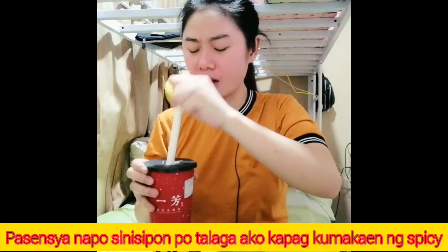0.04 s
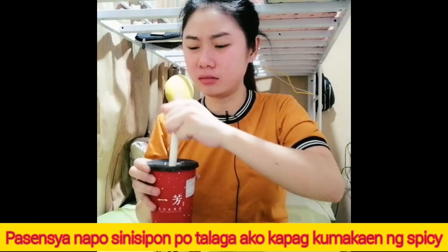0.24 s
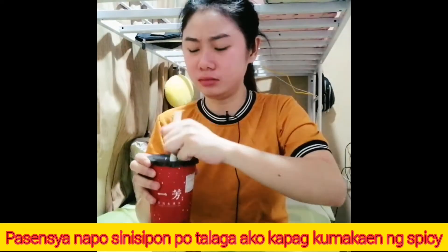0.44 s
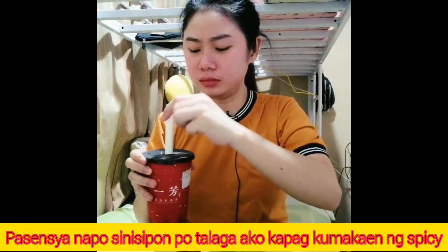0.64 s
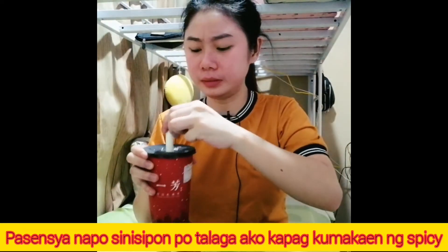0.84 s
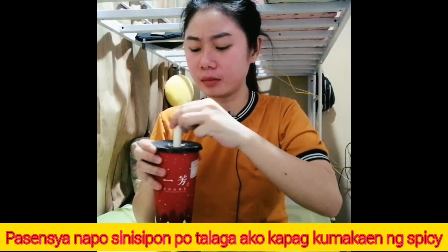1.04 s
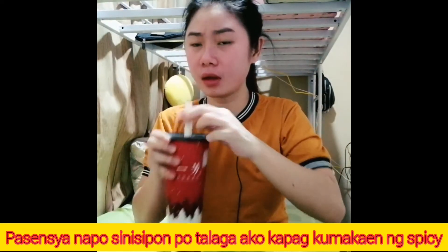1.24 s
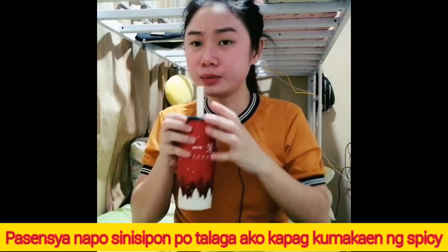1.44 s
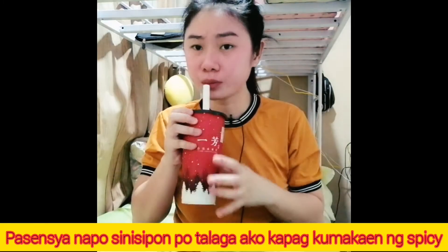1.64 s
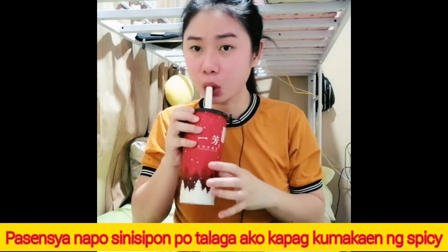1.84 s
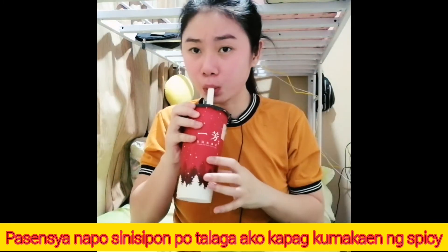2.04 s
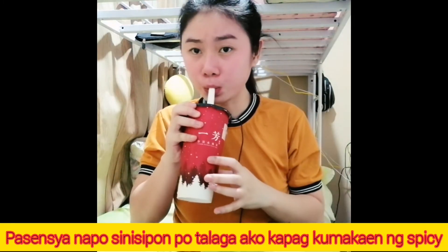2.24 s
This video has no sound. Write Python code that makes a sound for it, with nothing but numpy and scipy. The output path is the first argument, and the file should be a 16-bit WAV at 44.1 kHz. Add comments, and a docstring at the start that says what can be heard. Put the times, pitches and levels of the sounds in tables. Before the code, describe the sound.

Close up in a small room, a straw sticks and slips in a drink lid: one long rasping squeak, two shorter ones, then the cup is lifted with faint plastic ticks over low fan hum and rumble.

```python
"""A fan hums and handling rumbles from the start; two faint finger ticks follow in the first 0.11 s.
From 0.19 s a plastic straw is worked through a cup lid in three strokes, close up in a small room.
It sticks and slips: each slip knocks the lid and rings the cup; fast runs fuse into a squeak, single ones snap.
From 1.3 s, strokes over, the cup is lifted with more ticks (filtered noise bursts) and a faint rub.
The rumble and fan air are coloured noise; the fan air is loudest at 1.2 s."""
import sys
import numpy as np
from scipy import signal
from scipy.fft import rfft, irfft, next_fast_len
from scipy.io import wavfile

SR = 44100
rng = np.random.default_rng(int(sys.argv[2]) if len(sys.argv) > 2 else 0)


def transcribe(u):
    """Save the signal u as a 16-bit wav file named by the first command-line argument.

    u: samples, shape (n,) or (channels, n), limited to [-1, 1]; the rate is SR.
    q: integer samples, one column per channel.
    """
    v = np.clip(np.atleast_2d(u).T, -1, 1)
    q = np.round(v * 32767).astype(np.int16)
    wavfile.write(sys.argv[1], SR, q)


N = 101430

# Fan air spectrum. Each row: frequency in Hz, relative level in dB.
FAN_AIR_COLOUR = [(30, 16.5), (260, -2), (400, 5.5), (800, 3.5), (1800, -14.5), (3800, -29), (5500, -36),
                  (15000, -55)]
# Fan air level. Each row: time in seconds, rms level in dB.
FAN_AIR_LEVEL = [(.8, -52.5), (1.2, -42), (2.1, -50.5)]
# Fan motor lines. Each row: frequency in Hz, rms level in dB.
FAN_MOTOR_LINES = [(360.7, -60.5), (420, -60.5), (662, -61), (3752, -78)]

# Arm movements. Each row: centre in seconds, rumble level in dB, half length (to 1/e) in seconds.
ARM_MOVEMENTS = [(.01, -39.5, 0.035), (0.44, -35.5, 0.079), (1.776, -38, 0.086), (1.971, -35, 0.05),
                 (2.32, -35, 0.19)]
# Handling rumble spectrum. Each row: frequency in Hz, relative level in dB.
RUMBLE_COLOUR = [(10, -13), (25, 2), (75, 3), (160, -6.5), (250, -19), (600, -88.5)]
RUMBLE_FLOOR_DB = -58

# Fingers ticking on cup and straw. Each row: start in seconds, peak level in dB, centre frequency in Hz.
FINGER_TICKS = [(.068, -36.5, 2720), (0.106, -41, 2700), (1.07, -32, 2460), (1.303, -30.5, 2100),
                (1.307, -47, 6700), (1.3467, -36.5, 6260), (1.357, -48, 6940), (1.377, -36, 3000),
                (1.3916, -38.5, 4770), (1.417, -44.5, 5560), (1.427, -35, 1230), (1.5723, -40, 4030),
                (1.628, -35, 2640), (1.777, -42.5, 6930), (1.7918, -32, 2660), (1.917, -45, 3330)]
TICK_T60_CYCLES, TICK_RELATIVE_WIDTH, TICK_ATTACK_S = 42, .1, .00024
CRACK_DB, CRACK_T60_S, CRACK_TOP_HZ = -9, .0074, 4000
# Fingers sliding on the cup. Each row: time in seconds, level in dB.
RUB_LEVEL = [(.17, -60), (.85, -69.5), (1.05, -70.5), (1.42, -54.5), (1.54, -62.5), (1.64, -63),
             (1.73, -79), (1.83, -61.5), (1.97, -70)]
# Rub spectrum. Each row: frequency in Hz, relative level in dB.
RUB_COLOUR = [(800, -1.5), (2000, -7.5), (2750, 0.5), (3500, -6.5), (4700, -11), (8000, -39),
              (14000, -36.5)]
CRINKLE_DB, CRINKLE_PER_S = 5, 400

# Runs of slips, one table per run. Each row: time in seconds, slips per second, relative slip level in dB,
# edge level in dB relative to the slip, roughness from 0 to 1.
SLIP_RUNS = [
    [(.1912, 234, -18.5, 6, .1), (.208, 269, -5.5, 2, .2), (.226, 298, -3, 1, 0.27),
     (.247, 300, 0, -7.5, 0.01), (.26, 290, -3.5, -9, 0.16), (.275, 229, -2.5, -3, 0.31)],
    [(.3906, 191, -2.5, 8.5, 0.05), (.425, 196, -2.5, 6, .05), (.448, 202, -2, 2.5, .1),
     (.468, 233, -8.5, 10, 0.2), (.484, 238, -5.5, 3.5, 0.01), (.504, 260, 3, -4, 0.13)],
    [(.51, 299, 1.5, -0.5, 0.26), (.518, 382, -2.5, 3, .3), (.532, 388, -4, 4.5, 0),
     (.555, 394, -5.5, 2, 0.1), (.575, 396, -3.5, 9.5, .15), (.586, 377, 0.5, -1, 0.23),
     (.601, 195, -3.5, -6, 0.05)],
    [(.8828, 172.5, -11, -6, 0.09), (.902, 188.6, -8, -5, 0.19), (.912, 230, -4.5, 0.5, 0.08),
     (.929, 255, -7.5, -3.5, 0.01), (.941, 309, -4.5, 5, 0.04), (.953, 292, -3.5, -1.5, 0.01),
     (.966, 294, -1, -10.5, 0.09), (.981, 258, -5.5, 5, 0)],
    [(1.1767, 188, -6.5, -1.5, 0.11), (1.198, 193, -2.5, 1.5, 0.15), (1.211, 117, -5.5, -3, 0.01),
     (1.228, 155, -5, 0.5, 0), (1.238, 138, -0.5, 2.5, 0.19), (1.247, 194, -2.5, -4, 0)],
]
JITTER_PERIODS, SCATTER_DB = 0.41, 1.5  # standard deviations at roughness 1
# Single hard slips where the straw catches. Each row: time in seconds, relative level in dB.
SNAPS = [(0.2777, -0.5), (0.2876, -5.5), (0.3011, 2), (0.3145, -9.5), (0.32, 0), (0.3317, -2), (0.342, 1),
         (0.354, 0), (.3620, -4), (0.368, 0), (0.3797, -1), (.987, -5.5), (1.1639, -9)]
SNAP_EDGE_DB = 4
REBOUND_S, REBOUND_DB = .0049, -12.5  # a weaker slip follows each snap

# Lid swing locked to the slips. Each row: time in seconds, peak level in dB of the 1st, 2nd and 3rd
# multiple of the slip rate.
SWING_LEVELS = [(0.194, -27.5, -24.5, -45), (.245, -22, -11.5, -28), (.3, -39.5, -41.5, -45),
                (.39, -41.5, -48.5, -20), (.44, -19, -36.5, -15), (0.492, -19.5, -13.5, -10),
                (.512, -16, -21.5, -35), (.55, -9, -6.5, -50), (.595, -22.5, -16.5, -40),
                (.91, -48.5, -49.5, -45), (0.952, -20, -11.5, -34), (1.0, -47, -37.5, -50)]
SWING_LAG_S, SWING_FADE_S = 0.00038, .004

# Spectrum of a slip's push on the lid. Each row: frequency in Hz, relative level in dB.
LID_PUSH = [(40, -38), (140, -16.5), (250, -5.5), (600, 5), (1000, 7), (1500, -2.5), (1750, -14),
            (2100, -11), (2900, -23.5), (6500, -44.5), (14000, -73.5)]
LID_PUSH_DB = -4
# Main lid mode, shifting as the straw bends the lid. Each row: time in seconds, frequency in Hz.
LID_MODE_PITCH = [(.19, 1013), (.46, 1026), (.53, 828), (.6, 877), (.92, 1070), (.96, 1116), (1.2, 1169)]
LID_MODE_DB, LID_MODE_T60_S = -12.5, 0.027
# Modes of cup and lid. Each row: frequency in Hz, level in dB relative to the slip, t60 in seconds.
CUP_MODES = [(454, -32, 0.027), (760, -19, 0.033), (845, -25, .02), (1410, -31, .018), (1900, -24.5, 0.026)]
CUP_ATTACK_S = 0.0006
WALL_HZ, WALL_WIDTH_HZ = 1097, 230  # band that the thin cup wall holds back

# Spectrum of the lid's cut edge. Each row: frequency in Hz, relative level in dB.
EDGE_COLOUR = [(300, -33), (1500, 2.5), (2100, 4), (2800, -4), (3300, -7), (4900, -15.5), (6000, -28),
               (8000, -39), (13000, -54.5), (16000, -69)]
EDGE_DB, SCRAPE_DB, SCRAPE_T60_S = -16, -9.5, .008

# Room decay. Each row: frequency in Hz, t60 in seconds.
ROOM_DECAY = [(300, .14), (3000, 0.12), (14000, .16)]
ROOM_DB, ROOM_DELAY_S = -6, 0.002957
TOP_HZ = 15750


def amp(db):
    """Decibels to gain."""
    return 10 ** (np.asarray(db) / 20)


def unit(x):
    """x scaled to rms 1."""
    return x / np.sqrt(np.mean(x ** 2) + 1e-20)


def along(points, hz):
    """(Hz, value) points read on a log frequency axis."""
    f, value = np.transpose(points)
    return np.interp(np.log(hz + 1), np.log(f + 1), value)


def curve(rows):
    """(s, value) points read at every sample."""
    return np.interp(np.arange(N) / SR, *np.transpose(rows))


def filtered(x, response):
    """x times a response of frequency."""
    m = next_fast_len(N + SR // 2)
    return irfft(rfft(x, m) * response(np.fft.rfftfreq(m, 1 / SR)), m)[:N]


def noise(colour):
    """Coloured noise of rms 1."""
    return unit(filtered(rng.standard_normal(N), lambda hz: amp(along(colour, hz))))


def knock(colour, size=4096):
    """A causal minimum-phase pulse of peak 1 with this spectrum."""
    cepstrum = irfft(np.log(amp(along(colour, np.fft.rfftfreq(size, 1 / SR)))))
    # fold onto positive time
    cepstrum[1:size // 2] *= 2
    cepstrum[size // 2 + 1:] = 0
    pulse = irfft(np.exp(rfft(cepstrum)))
    return pulse / np.abs(pulse).max()


def pulses(times, sizes, order=8):
    """Impulses placed between samples by windowed sinc."""
    at = times[:, None] * SR
    i = np.floor(at).astype(int) + np.arange(1 - order, order + 1)
    weight = np.sinc(i - at) * np.cos(np.pi * (i - at) / (2 * order)) ** 2
    return np.bincount(i.ravel(), (weight * sizes[:, None]).ravel(), N)[:N]


def through(x, h):
    """x played through an impulse response."""
    return signal.fftconvolve(x, h)[:N]


def fan():
    """Air noise of slowly varying level, with steady motor lines."""
    t = np.arange(N) / SR
    hum = np.zeros(N)
    for hz, db in FAN_MOTOR_LINES:
        hum += amp(db) * np.sqrt(2) * np.sin(2 * np.pi * (hz * t + rng.random()))
    return hum + amp(curve(FAN_AIR_LEVEL)) * noise(FAN_AIR_COLOUR)


def handling():
    """Each arm movement swells the rumble in the microphone."""
    t = np.arange(N) / SR
    swell = sum(amp(db) * np.exp(-((t - s) / half) ** 2) for s, db, half in ARM_MOVEMENTS)
    return (amp(RUMBLE_FLOOR_DB) + swell) * noise(RUMBLE_COLOUR)


def finger_ticks():
    """Small plastic ticks: a narrow noise ring decaying over a few dozen cycles, plus a dull crack."""
    out, t = np.zeros(N + SR), np.arange(SR // 10) / SR
    f = np.fft.rfftfreq(len(t), 1 / SR)
    for s, db, hz in FINGER_TICKS:
        grit = rfft(rng.standard_normal(len(t)))
        ring = unit(irfft(grit / (1 + ((f - hz) / (TICK_RELATIVE_WIDTH * hz)) ** 2), len(t)))
        crack = unit(irfft(grit / (1 + (f / CRACK_TOP_HZ) ** 4), len(t)))
        tick = ring * amp(-60 * t * hz / TICK_T60_CYCLES)
        tick += crack * amp(CRACK_DB - 60 * t / CRACK_T60_S)
        tick *= (1 - np.exp(-t / TICK_ATTACK_S)) ** 2
        out[round(s * SR):][:len(t)] += amp(db) * tick / np.abs(tick).max()
    return out[:N]


def finger_rub():
    """Fingers sliding as the grip changes: coloured noise under a crinkling gain."""
    return amp(curve(RUB_LEVEL)) * noise(RUB_COLOUR) * crinkle()


def crinkle():
    """A fast random gain of rms 1."""
    knots = rng.standard_normal(N)
    wander = np.interp(np.arange(N) * CRINKLE_PER_S / SR, np.arange(N), knots)
    return unit(amp(CRINKLE_DB * wander))


def slips(run):
    """Time, level and edge level of each slip: one per turn of the slip rate, scattered by roughness."""
    s, rate, level, edge, rough = np.transpose(run)
    t = np.arange(s[0], s[-1], 1 / SR)
    turns = np.cumsum(np.interp(t, s, rate)) / SR
    at = np.interp(np.arange(int(turns[-1]) + 1), turns, t)
    chance = rng.standard_normal(size=(256, 2))[:len(at)]
    rate, level, edge, rough = (np.interp(at, s, column) for column in (rate, level, edge, rough))
    jittered = at + JITTER_PERIODS * rough * chance[:, 0] / rate
    return jittered, level + SCATTER_DB * rough * chance[:, 1], edge


def snaps():
    """Time, level and edge level of each single slip and its rebound."""
    rows = []
    for s, db in SNAPS:
        rows.append((s, db, SNAP_EDGE_DB))
        rows.append((s + REBOUND_S, db + REBOUND_DB, SNAP_EDGE_DB))
    return np.transpose(rows)


def swing(run):
    """The clean squeal of the lid: three multiples of the slip rate, in step with the unjittered slips."""
    s, rate = np.transpose(run)[:2]
    t = np.arange(N) / SR
    to_edge_s = np.minimum(t - s[0], s[-1] + SWING_FADE_S - t)
    held = np.clip(to_edge_s / SWING_FADE_S, 0, 1)
    turns = np.cumsum(np.interp(t, s, rate) * (t >= s[0] + SWING_LAG_S)) / SR
    squeal = np.zeros(N)
    table = np.transpose(SWING_LEVELS)
    for k in (1, 2, 3):
        squeal += amp(np.interp(t, table[0], table[k])) * np.cos(2 * np.pi * k * turns)
    return -held * squeal


def cup_ring(jerks):
    """Each jerk excites decaying modes of cup and lid."""
    t = np.arange(SR // 5) / SR
    ring = sum(amp(db - 60 * t / t60) * np.sin(2 * np.pi * hz * t) for hz, db, t60 in CUP_MODES)
    return through(jerks, ring * (1 - np.exp(-t / CUP_ATTACK_S)))


def lid_ring(at, level):
    """Each slip rings the lid at the pitch its bend gives it at that moment."""
    out, t = np.zeros(N + SR), np.arange(SR // 20) / SR
    for s, db in zip(at, level):
        hz = np.interp(s, *np.transpose(LID_MODE_PITCH))
        decay = amp(db + LID_MODE_DB - 60 * t / LID_MODE_T60_S)
        out[round(s * SR):][:len(t)] += decay * np.sin(2 * np.pi * hz * t)
    return out[:N]


def cup_wall(x):
    """The thin wall delays its own band (an all-pass), so a short ring follows the spike of each slip."""
    def lag(f):
        return WALL_HZ ** 2 - f ** 2 + 1j * f * WALL_WIDTH_HZ
    return filtered(x, lambda f: np.conj(lag(f)) / lag(f))


def edge_scrape(at, level):
    """Each slip clicks on the lid's cut edge and leaves a short decaying burst of noise."""
    t = np.arange(SR // 5) / SR
    clicks = pulses(at, amp(level))
    scrape = through(clicks, amp(SCRAPE_DB - 60 * t / SCRAPE_T60_S)) * rng.standard_normal(N)
    return amp(EDGE_DB) * through(clicks + scrape, knock(EDGE_COLOUR))


def straw():
    """Every slip jerks the lid inward, rings lid and cup and scrapes the lid's edge."""
    at, level, edge = np.hstack([slips(run) for run in SLIP_RUNS] + [snaps()])
    jerks = pulses(at, amp(level))
    lid = amp(LID_PUSH_DB) * through(jerks, knock(LID_PUSH)) + lid_ring(at, level)
    body = cup_wall(cup_ring(jerks) + lid)
    squeal = sum(swing(run) for run in SLIP_RUNS)
    return squeal - body + edge_scrape(at, level + edge)  # minus: inward


def room(x):
    """A short diffuse tail, each frequency dying at its own speed."""
    hz, t, z = signal.stft(rng.standard_normal(SR // 2), SR, nperseg=256)
    decay = amp(-60 * t / along(ROOM_DECAY, hz)[:, None])
    tail = signal.istft(z * decay, SR, nperseg=256)[1]
    return through(x, np.pad(tail / np.linalg.norm(tail), (round(ROOM_DELAY_S * SR), 0)))


def scene():
    """The cup in its room, over the background."""
    cup = straw() + (finger_ticks() + finger_rub())
    return (cup + amp(ROOM_DB) * room(cup) + handling() + fan())[None]


def record(dry):
    """The loudest peaks are rounded off near full scale, then the band is limited."""
    top, knee = .95, 30
    clipped = dry / (1 + np.abs(dry / top) ** knee) ** (1 / knee)
    low_pass = signal.ellip(10, .1, 80, TOP_HZ, fs=SR, output="sos")
    return signal.sosfilt(low_pass, clipped)


dry = scene()
out = record(dry)
transcribe(out)
```